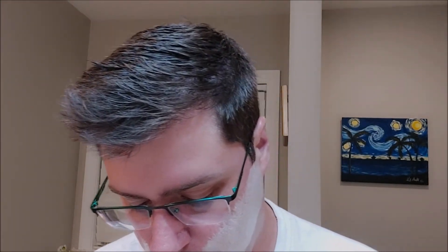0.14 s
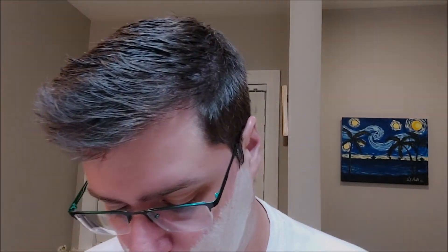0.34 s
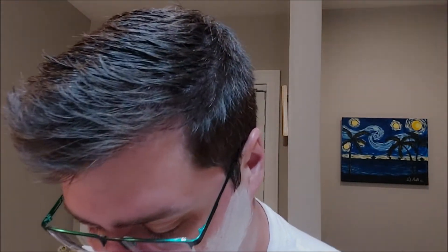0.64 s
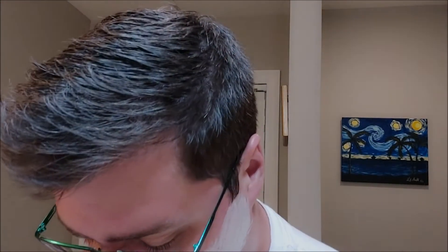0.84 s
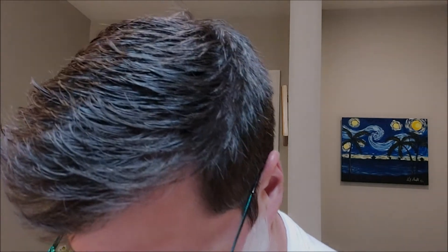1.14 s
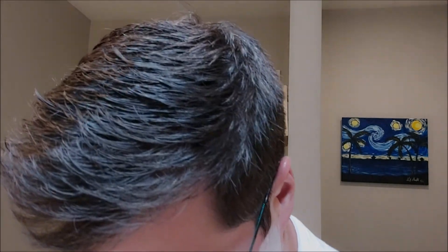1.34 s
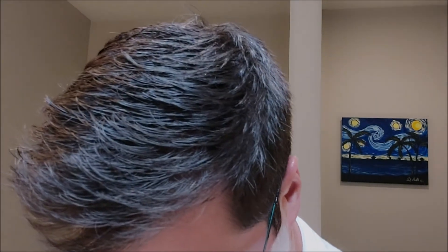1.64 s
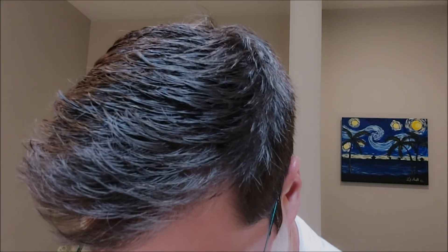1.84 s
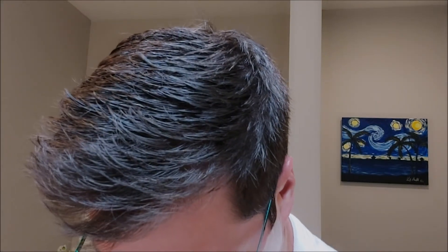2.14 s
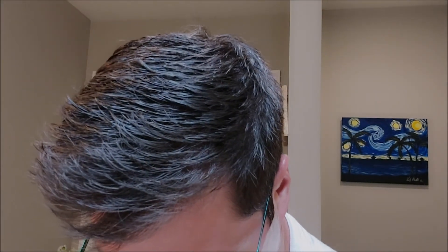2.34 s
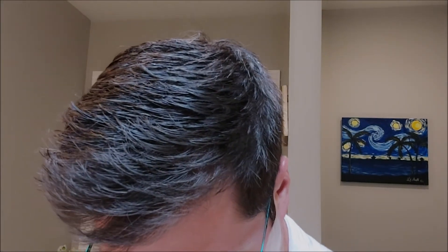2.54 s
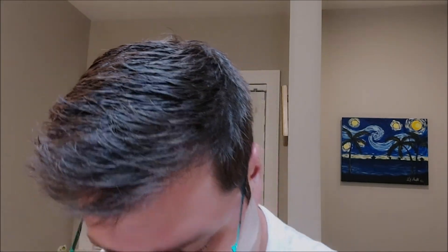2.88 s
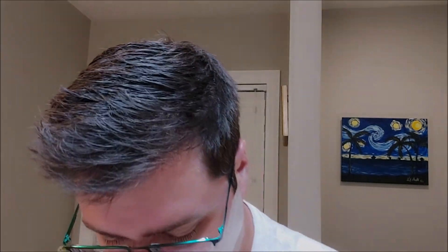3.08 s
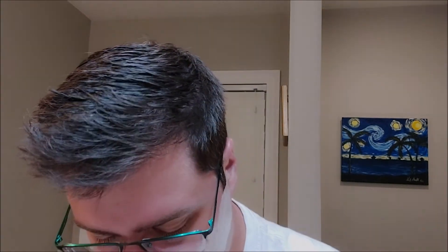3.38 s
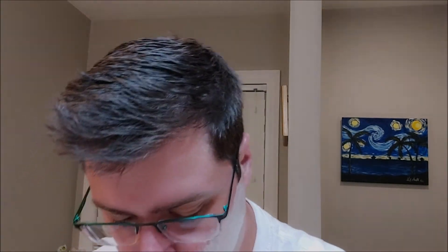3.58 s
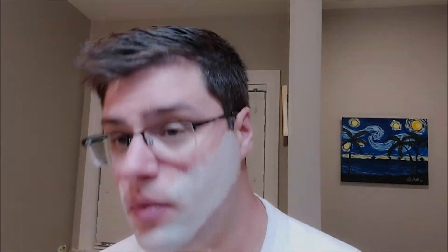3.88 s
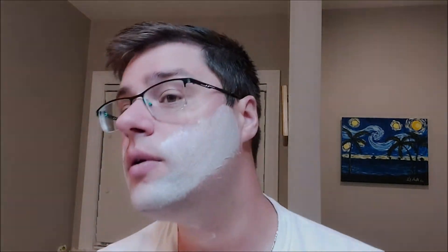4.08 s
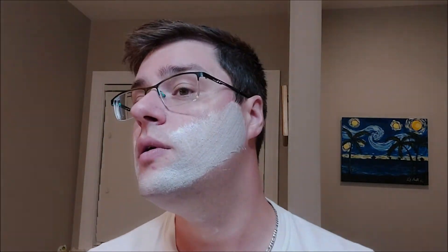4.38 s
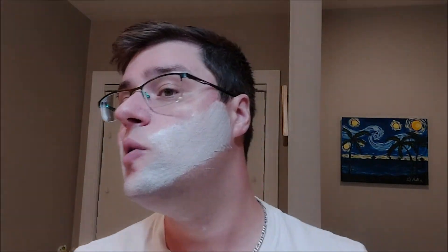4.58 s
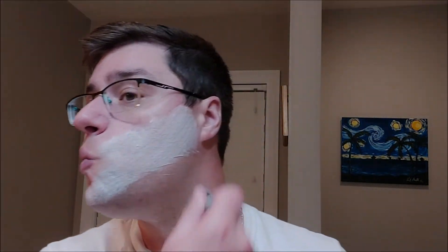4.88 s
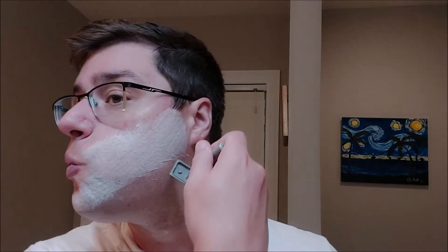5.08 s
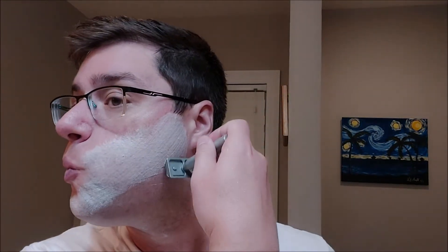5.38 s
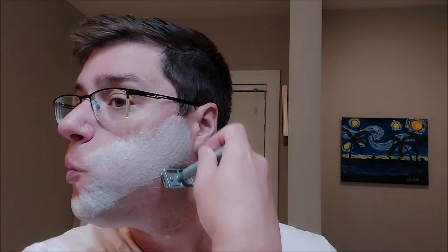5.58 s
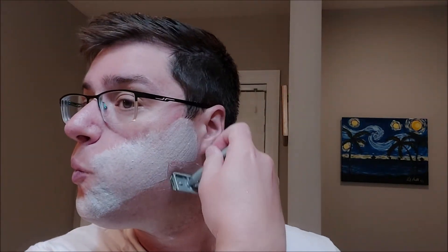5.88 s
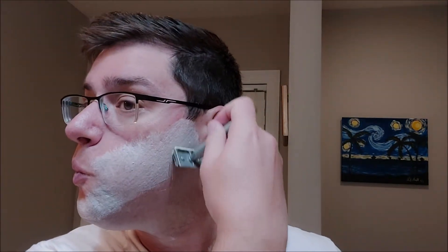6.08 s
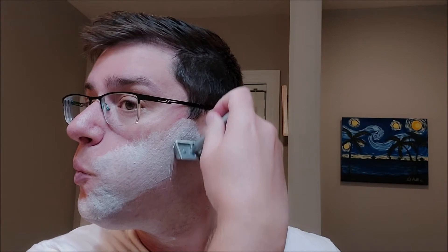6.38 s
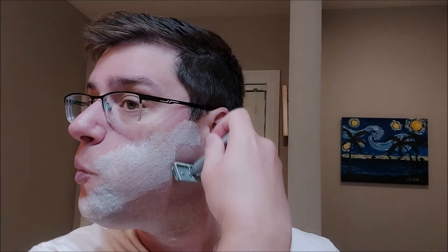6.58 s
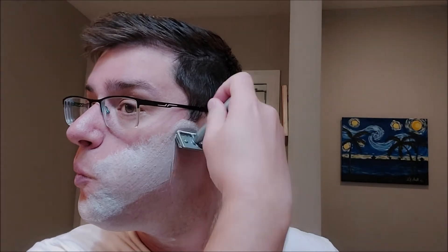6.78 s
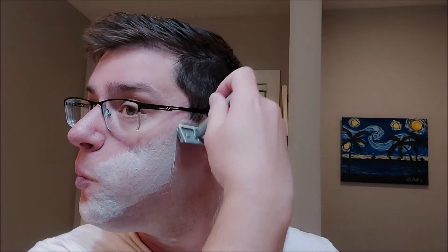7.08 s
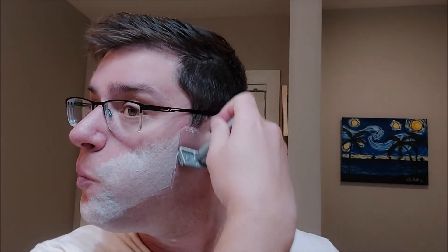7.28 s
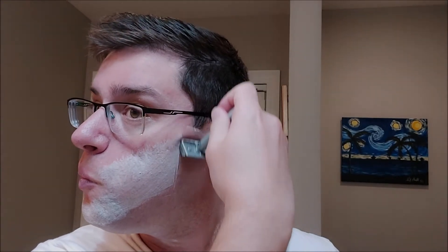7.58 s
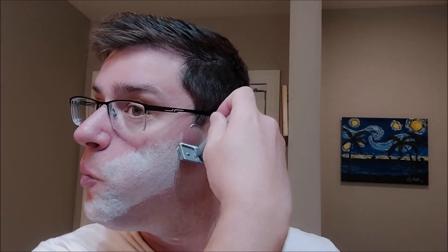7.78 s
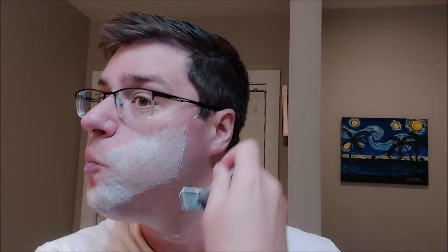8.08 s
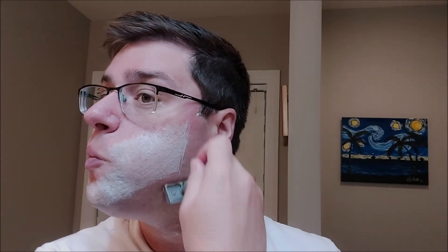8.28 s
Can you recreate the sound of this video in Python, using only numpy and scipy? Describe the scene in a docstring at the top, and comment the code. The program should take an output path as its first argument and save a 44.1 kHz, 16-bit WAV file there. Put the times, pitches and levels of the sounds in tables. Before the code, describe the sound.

From 0 to 3.5 seconds a tap runs strongly into a bathroom basin, a bright, hissing, wide spray with coarser spatter. Sharp little splashes off a rinsed razor cluster in the first half second, then come singly until 3.3. Soft muffled bumps pass through the counter, the heaviest a low thud at 3.0. Around 3.6 the water cuts off with a dull, briefly ringing knock and low thumps. From 3.7 to 4.5 the drain gurgles in gulps, with fine trickling, ticks and rising-pitched drips, drying out by 4.7. Quiet ventilation rumble, low hum and faint hiss remain. Tiny handling touches come near 5.45 and 5.55. From 5.76 short, faint, crisp scrapes of blade through lather and stubble repeat every quarter to third of a second, at about 6.04, 6.36, 6.7, 7.05, 7.39, 7.66 and 7.93, with one last faint stroke starting at 8.4.

```python
"""A tap runs into a bathroom sink: stereo noise and droplet grains coloured by spout and basin resonances,
with droplet bursts splashing off a razor and soft bumps through the counter. The tap shuts with a ringing knock,
then the last water gurgles, trickles and drips away. After two faint handling touches the razor scrapes short
strokes through lather and stubble: dense hair snaps over a duller rasp. Behind it all lie ventilation rumble,
hum, hiss and thin motor tones. Splashes, drips, ticks and knocks leave a short hard room tail."""
import sys
import numpy as np
from scipy import signal
from scipy.fft import rfft, irfft
from scipy.io import wavfile

SR = 44100
rng = np.random.default_rng(int(sys.argv[2]) if len(sys.argv) > 2 else 0)


def to_wav(sig):
    """Store sig (one row per channel, or 1-D mono) as 16-bit WAV at the path in sys.argv[1].

    Samples outside -1..1 are clipped; the rate is SR.
    """
    pcm = np.clip(np.atleast_2d(sig), -1, 1) * 32767
    pcm = np.round(pcm).astype(np.int16)
    wavfile.write(sys.argv[1], SR, pcm.T)  # frames by channels


N = 371763
TIME = np.arange(N) / SR   # seconds
HZ = np.fft.rfftfreq(N, 1 / SR) + 1e-3   # kept off zero for the logarithms
EARS = np.array([[1], [-1]])   # left, right

# Strength of the jet, heard as spray. Each row: time in seconds, level in dB.
JET_LEVEL = [(0.0, -38), (0.14, -37.5), (0.53, -33), (0.6, -35), (2.8, -35.5), (2.85, -31), (3.31, -33),
             (3.49, -35), (3.6, -48.5), (3.8, -84)]
# Spectrum of the running water. Each row: frequency in Hz, relative level in dB per Hz.
WATER_SPECTRUM = [(88, -35), (150, 1.5), (182, 0.5), (649, -6.5), (1040, -2.5), (1240, -7), (1600, -3.5),
                  (2100, -8), (3220, -6), (5360, -6.5), (14200, -1), (16000, -2)]
# Resonances of spout and basin. Each row: frequency in Hz, width in Hz, lift in dB.
SPOUT_RESONANCES = [(230, 40, 4), (470, 30, 4), (1050, 110, 8), (1580, 170, 9), (3250, 400, 5),
                    (6430, 80, 2.5), (7920, 300, 2), (9370, 90, 3), (10600, 130, 3), (12200, 120, 2),
                    (14000, 180, 5)]
# The jet breaks up for a moment. Each row: peak time in seconds, added spray in dB, added spatter in dB.
SURGES = [(0.0, -32, -45), (0.16, -37, -52), (0.39, -51, -50), (0.553, -41, -46.5), (1.015, -52, -42.5),
          (1.345, -42, -49), (1.8, -48.5, -50), (2.66, -59, -51), (2.84, -47, -57), (3.62, -43, -82),
          (3.675, -47, -77)]
SURGE_RISE_DB_PER_S, SURGE_FALL_DB_PER_S = 399, 220.5
FULL_JET_DB = -35.5   # jet level at which the spatter has its own level
SPATTER_DB, SPATTER_FOLLOWS = -46.5, 0.62   # coarser spatter on the porcelain; share of the jet's swing in dB
SPOUT_DB, SHUT_S, SHUT_DB_PER_S = -44, 3.523, 104   # hiss in spout and basin, dying once the tap closes

# Level of the background rumble, hum and hiss. Each row: time in seconds, level in dB.
BACKGROUND_LEVEL = [(0.0, -45.5), (3.87, -46.5), (4.69, -51), (7.47, -50.5), (8.43, -52.5)]
# Spectrum of the rumble. Each row: frequency in Hz, relative level in dB per Hz.
RUMBLE_SPECTRUM = [(20, -24), (32, -18), (42, -23.5), (52, -4), (70, -5.5), (95, -6.5), (130, -5),
                   (170, -21.5), (240, -19), (330, -18), (450, -28), (640, -35.5), (750, -42), (850, -39.5),
                   (950, -47), (1250, -54)]
# Spectrum of the steady hiss. Each row: frequency in Hz, relative level in dB per Hz.
HISS_SPECTRUM = [(900, -16), (1400, -6), (2200, -7.5), (3500, -14.5), (4300, -10), (6000, -9.5),
                 (9000, -8.5), (13000, -6.5), (14800, -8), (15800, -18.5)]
RUMBLE_DB, HISS_DB = -3.5, -27   # relative to the background level
# Hum. Each row: frequency in Hz, level in dB relative to the background level, spread of the waver in dB.
HUM = [(59.7, -6.5, 6.5), (72.8, -6.5, 3), (118.6, -10, 4.5), (252, -30, 3.5)]
# Thin motor tones. Each row: frequency in Hz, approximate rms level in dB.
MOTOR_TONES = [(839.8, -86), (1080, -98.5), (1798, -91), (4200, -101), (9000, -101), (10800, -101),
               (13200, -100)]

# Splashes off razor and basin. Each row: start in seconds, level in dB, centre in Hz, 60 dB decay in seconds.
SPLASHES = [(0.0463, -23.5, 8040, 0.0062), (0.152, -36, 9000, 0.056), (0.2382, -24.5, 4850, 0.0083),
            (0.359, -27.5, 4320, 0.015), (0.3952, -32, 2980, 0.011), (0.4543, -28, 4850, 0.026),
            (0.475, -30, 6730, 0.017), (0.542, -27.5, 7700, 0.033), (1.0123, -29.5, 2900, 0.027),
            (1.349, -37, 10900, 0.045), (1.5402, -31.5, 3340, 0.017), (1.78, -29.5, 6300, 0.012),
            (1.989, -28.5, 4120, 0.028), (2.474, -28, 3280, 0.013), (2.56, -27.5, 3780, 0.011),
            (2.834, -32, 3800, 0.051), (2.988, -32, 6480, 0.026), (3.277, -29, 10800, 0.012)]
# Soft bumps carried through counter and cabinet. Each row: start in seconds, peak in dB, frequency in Hz,
# rise in seconds, 60 dB decay in seconds.
BUMPS = [(0.972, -36.5, 228, 0.038, 0.055), (1.274, -36, 312, 0.013, 0.26), (2.34, -44.5, 225, 0.015, 0.24),
         (2.718, -39.5, 236, 0.013, 0.3), (3.019, -16.5, 125.6, 0.034, 0.14), (3.028, -31, 74, 0.031, 0.13),
         (3.089, -27.5, 123, 0.039, 0.08), (3.616, -25.5, 128.5, 0.028, 0.14),
         (3.681, -27.5, 124, 0.011, 0.091), (4.359, -40, 300, 0.016, 0.37)]
# Knocks on the tap body. Each row: start in seconds, level in dB.
KNOCKS = [(3.609, -30), (3.874, -45.5), (4.365, -54)]
# Modes of the tap body. Each row: frequency in Hz, level in dB relative to the knock, nominal decay in seconds
# (the clean ring takes a little less, the rattle more).
TAP_MODES = [(408, -8, 0.28), (467, -3, 0.27), (592, 0, 0.045), (642, -17, 0.55), (698, -16.5, 0.24),
             (1016, -1.5, 0.042), (1110, -24, 0.06), (1800, -29, 0.04)]

# Drips. Each row: start in seconds, level in dB, starting pitch of the bubble in Hz.
DRIPS = [(3.7704, -43.5, 2970), (3.874, -37.5, 2350), (3.91, -42, 2370), (3.9669, -46, 3480),
         (4.018, -48, 2330), (4.047, -47, 1590), (4.1455, -43, 4260), (4.182, -32.5, 4100),
         (4.249, -38, 2640), (4.2712, -41.5, 1390), (4.3082, -46, 1400), (4.418, -47, 1720),
         (4.4407, -51, 1680), (4.633, -62, 2330)]
# Short ticks of water, then of the razor touching. Each row: start in seconds, level in dB, centre in Hz.
TICKS = [(3.6196, -46, 7500), (3.675, -30, 5430), (3.704, -37, 8210), (3.729, -38, 8840),
         (3.8084, -44, 8300), (3.8713, -45, 6050), (3.968, -46, 8500), (4.0456, -40.5, 10800),
         (4.0701, -54, 10100), (4.17, -39, 11300), (4.183, -47, 14000), (4.233, -42, 8700),
         (4.27, -46.5, 8640), (4.365, -43.5, 8700), (4.459, -49.5, 6060), (4.505, -52, 6650),
         (4.6505, -58.5, 6330), (5.2635, -61.5, 12870), (5.4535, -58, 5000), (5.4923, -61, 2400),
         (5.556, -55.5, 7620), (5.59, -56, 8900), (6.3124, -62, 10970), (6.3405, -70, 8340)]
TICK_T60_S = .009
# The last water leaves the basin in gulps. Each row: peak time in seconds, gurgle in dB, trickle in dB,
# trickle fading in dB per second.
GULPS = [(3.63, -50, -42, 104), (3.874, -46.5, -57.5, 32), (4.176, -47.5, -58, 49), (4.367, -52, -65.5, 23)]
# Spectrum of the gurgle. Each row: frequency in Hz, relative level in dB per Hz.
GURGLE_SPECTRUM = [(120, -26), (200, 0.5), (302, -2), (390, -19), (444, -2.5), (652, -30), (879, -5.5),
                   (1070, -29), (1470, -15), (4200, -18), (6000, -62), (7800, -56), (13200, -120)]
GULP_RISE_DB_PER_S, GURGLE_FALL_DB_PER_S = 500, 30.5
DRY_S, DRY_DB_PER_S = 4.49, 51   # the basin starts to run dry at this rate, then ever faster

# Razor sounds: two faint handling touches, then strokes on the cheek. Each row: touch in seconds,
# bite in dB relative to full strength, build-up in seconds, hold in seconds, scrape level in dB.
RAZOR_MOVES = [(5.447, -2, .005, .01, -73), (5.55, -4, 0.018, .03, -84), (5.763, -9, .01, .05, -56),
               (6.039, -13, 0.074, .02, -58), (6.36, -14, 0.067, 0.064, -57),
               (6.704, -10, 0.086, 0.072, -56), (7.046, -17, .11, 0.041, -56.5),
               (7.388, -6, 0.072, .03, -60), (7.664, -10, 0.044, 0.027, -60.5),
               (7.929, -13, 0.033, 0.0092, -58.5), (8.396, -9, .04, .03, -65)]
# Spectrum of the scrape, thinned further below 3500 Hz. Each row: frequency in Hz, relative level in dB per Hz.
BLADE_SPECTRUM = [(1470, -39), (2500, -29), (3720, -15), (4580, -6), (7080, -4), (8530, -2), (12500, 1),
                  (15200, 2), (16000, -9.5)]
# Duller rasp of the razor sounds. Each row: peak time in seconds, level in dB, centre in Hz.
RASPS = [(5.454, -84, 3400), (5.49, -80, 1800), (5.59, -87, 2500), (5.86, -84, 3400), (6.09, -87, 2480),
         (6.43, -79.5, 2480), (6.745, -71.5, 2600), (6.85, -88, 3600), (7.13, -84, 2400),
         (7.225, -77, 1500), (7.42, -92, 2470), (7.7, -90, 2500)]
TOUCH_S = 0.0056   # quick onset
SAG_DB_PER_S, LIFT_DB_PER_S = 45, 200   # the move slackens while held, then dies away
RASP_RISE_DB_PER_S, RASP_FALL_DB_PER_S = 900, 110
RASP_WIDTH = .2   # spread of the rasp bands in log pitch

# Likeness of the two ears in noise. Each row: frequency in Hz, likeness from 0 to 1.
LIKENESS = [(60, 1), (200, 0.89), (380, 0.83), (700, 0.063), (1290, 0.23), (2400, 0.11), (8000, 0.0)]
# Stereo colour of the sink. Each row: frequency in Hz, left minus right in dB.
SINK_BALANCE = [(60, 7), (250, 1.5), (600, -0.9), (1400, -0.8), (2800, 2.5), (5600, -2), (10000, 1.3),
                (14000, 1)]
ROOM_LEFT_DB = 1.06   # left minus right of bumps, razor and ventilation
ROOM_T60_S, ROOM_DB = .25, 1   # room tail: decay, level relative to the direct sound
CUTOFF_HZ = 16000


def from_db(db):
    """Gain of a level."""
    return 10 ** (np.asarray(db) / 20)


def rms_one(x):
    """Scale to unit rms."""
    return x / np.sqrt(np.mean(x ** 2) + 1e-20)


def in_time(rows):
    """Level curve at every sample, in dB; silent outside its span."""
    s, db = np.transpose(rows)
    return np.interp(TIME, s, db, left=-120, right=-120)


def at_hz(points, hz):
    """A spectrum read on a log-frequency axis."""
    point_hz, value = np.transpose(points)
    return np.interp(np.log(hz), np.log(point_hz), value)


def colour(x, gain):
    """Filter by a gain per frequency; rms 1."""
    return rms_one(irfft(rfft(x) * gain, N))


def drift(rate_hz):
    """Slow random wandering of spread 1."""
    return colour(rng.standard_normal(N), 1 / (1 + (HZ / rate_hz) ** 2) * (HZ > .3))


def swell(s, db, rise_db_per_s, fall_db_per_s):
    """Gain that climbs to a peak at a time and falls away, both steadily in dB; a rate of 0 holds level."""
    return from_db(db - np.maximum(rise_db_per_s * (s - TIME), fall_db_per_s * (TIME - s)))


def stereo_noise():
    """White noise, alike in both ears in the bass and unrelated in the treble."""
    mid, side = rfft(rng.standard_normal((2, N)))
    alike = np.clip(at_hz(LIKENESS, HZ), 0, 1)
    return irfft(np.sqrt(1 + alike) * mid + np.sqrt(1 - alike) * side * EARS, N)


def grains(per_s, spread_db):
    """Random stereo clicks of uneven size and either sign."""
    born = rng.random((2, N)) < per_s / SR
    size_db = spread_db * np.minimum(rng.exponential(1, (2, N)), 5)
    return born * from_db(size_db) * rng.choice([-1, 1], (2, N))


def droplets(per_s, spread_db, low_hz, high_hz, cycles):
    """Grains dealt to twelve small resonators spread in pitch, each dying 60 dB in so many cycles; rms 1."""
    clicks = grains(per_s, spread_db)
    dealt = rng.integers(0, 12, N)
    out = 0
    for k, hz in enumerate(np.geomspace(low_hz, high_hz, 12)):
        r = from_db(-60 * hz / (cycles * SR))   # pole radius
        w = 2 * np.pi * hz / SR
        ring_in, ring_back = [0, np.sin(w) * np.sqrt(hz)], [1, -2 * r * np.cos(w), r * r]
        out = out + signal.lfilter(ring_in, ring_back, clicks * (dealt == k) + 1e-18)
    return rms_one(out)


def band_noise(noise, hz, q):
    """Noise through one resonance; rms 1."""
    return rms_one(signal.lfilter(*signal.iirpeak(hz, q, fs=SR), noise))


def add(out, s, sound):
    """Mix a short sound in at a time."""
    at = int(s * SR)
    out[at:at + len(sound)] += sound[:N - at]


def jet():
    """Spray noise and droplet grains, lifted at the spout resonances; bands flicker partly on their own."""
    jet_db = in_time(JET_LEVEL)
    spray_gain = from_db(jet_db)
    spatter_gain = from_db(SPATTER_DB + SPATTER_FOLLOWS * (jet_db - FULL_JET_DB))
    for s, spray_db, spatter_db in SURGES:
        spray_gain = spray_gain + swell(s, spray_db, SURGE_RISE_DB_PER_S, SURGE_FALL_DB_PER_S)
        spatter_gain = spatter_gain + swell(s, spatter_db, SURGE_RISE_DB_PER_S, SURGE_FALL_DB_PER_S)
    spout_gain = swell(SHUT_S, SPOUT_DB, 0, SHUT_DB_PER_S)

    lift_db = sum(db / (1 + (2 * (HZ - hz) / width) ** 2) for hz, width, db in SPOUT_RESONANCES)
    gain = from_db(at_hz(WATER_SPECTRUM, HZ) + lift_db)
    water = stereo_noise() + 0.46 * rms_one(grains(3000, 3.5))
    water += .5 * droplets(1500, 3.37, 2000, 13000, cycles=24.0)

    # power shares below each edge: spout hiss lowest, spatter between, spray on top
    low, middle = 1 / (1 + (HZ / 2200) ** 8), 1 / (1 + (HZ / 4500) ** 8)
    out = spout_gain * from_db(drift(7.6)) * colour(water, gain * np.sqrt(low))
    spatter = colour(water, gain * np.sqrt((1 - low) * middle))
    out += spatter_gain * from_db(1.3 * drift(27) + 1.5 * drift(1.0)) * spatter

    together, spray = drift(55), 0
    spray_spectrum = rfft(water) * gain * np.sqrt(1 - middle)
    half_octave = np.clip(2 * np.log2(HZ / 5000), 0, 3)
    for k in range(4):   # overlapping half-octave windows that sum to one
        window = np.clip(1 - np.abs(half_octave - k), 0, 1)
        flicker_db = 0.83 * together + 1.7 * drift(12)
        spray = spray + from_db(flicker_db) * irfft(spray_spectrum * window, N)
    return out + spray_gain * rms_one(spray)


def wavering(hz, waver_db):
    """A steady tone whose strength wanders; rms about 1."""
    tone = np.sin(2 * np.pi * (hz * TIME + rng.random()))
    return np.sqrt(2) * from_db(waver_db * drift(4.0)) * tone


def ventilation():
    """Rumble with wavering hum, thin motor tones and a steady hiss."""
    rumble = from_db(RUMBLE_DB) * colour(stereo_noise(), from_db(at_hz(RUMBLE_SPECTRUM, HZ)) * (HZ < 1300))
    hum = sum(from_db(db) * wavering(hz, waver_db) for hz, db, waver_db in HUM)
    hiss = from_db(HISS_DB) * colour(stereo_noise(), from_db(at_hz(HISS_SPECTRUM, HZ)) * (HZ > 900))
    tones = sum(from_db(db) * wavering(hz, 1.1) for hz, db in MOTOR_TONES)
    return from_db(in_time(BACKGROUND_LEVEL)) * (rumble + hum + hiss) + tones


def splashes():
    """Bursts of droplets: dying noise in a broad band around a centre, brightened by its own differences."""
    out, t = np.zeros(N), np.arange(SR // 8) / SR
    for s, db, hz, t60 in SPLASHES:
        noise = rng.standard_normal(len(t))
        burst = band_noise(noise, hz, 2.5) + 0.53 * np.diff(noise, prepend=0)
        add(out, s, from_db(db - 60 * t / t60) * burst)
    return out


def bumps():
    """Low panel modes that swell and die."""
    out, t = np.zeros(N), np.arange(SR // 2) / SR
    for s, db, hz, rise, t60 in BUMPS:
        onset = np.sin(np.pi / 2 * np.minimum(t / rise, 1)) ** 2
        decay = from_db(-60 * np.maximum(t - rise, 0) / t60)
        add(out, s, from_db(db) * onset * decay * np.sin(2 * np.pi * hz * t))
    return out


def tap():
    """Each knock rings the modes of the tap body, and loose parts keep rattling them briefly."""
    out, t = np.zeros(N), np.arange(SR // 2) / SR
    for s, db in KNOCKS:
        for hz, level_db, t60 in TAP_MODES:
            clean = np.sin(2 * np.pi * hz * t) * from_db(-60 * t / (0.8 * t60))
            rattle = band_noise(rng.standard_normal(len(t)), hz, 5.5) * from_db(-60 * t / (1.77 * t60))
            add(out, s, from_db(db + level_db) * (clean + .5 * rattle))
    return out


def drips_and_ticks():
    """A drip is a bubble ringing a few cycles, rising in pitch; a tick is a snap of noise around its centre."""
    out, t = np.zeros(N), np.arange(SR // 20) / SR
    for s, db, hz in DRIPS:
        t60 = 0.0063 + 44.0 / hz
        plop = band_noise(rng.standard_normal(len(t)), hz, 1.5)
        bubble = np.sin(2 * np.pi * hz * t * (1 + 0.07 * np.minimum(t / t60, 1)))
        add(out, s, from_db(db - 60 * t / t60) * (bubble + 0.4 * plop))
    for s, db, hz in TICKS:
        noise = rng.standard_normal(len(t))
        snap = band_noise(noise, hz, 2.2) + 0.071 * np.diff(noise, 2, prepend=[0, 0])
        add(out, s, from_db(db - 60 * t / TICK_T60_S) * snap)
    return out


def drain():
    """Lumpy gurgle in the waste pipe and a fine trickle of droplets, renewed by every gulp."""
    wet = swell(DRY_S, 0, 0, DRY_DB_PER_S) ** (1 + np.maximum(TIME - DRY_S, 0))
    gurgles = [swell(s, db, GULP_RISE_DB_PER_S, GURGLE_FALL_DB_PER_S) for s, db, _, _ in GULPS]
    trickles = [swell(s, db, GULP_RISE_DB_PER_S, fall) for s, _, db, fall in GULPS]
    gurgle_gain, trickle_gain = np.max(gurgles, axis=0), np.max(trickles, axis=0)

    lumps = stereo_noise() + 0.72 * droplets(300, 2.8, 791, 4430, cycles=81.0)
    lumps += .5 * droplets(400, 4.5, 1140, 6000, cycles=8.0)
    gurgle = colour(lumps, from_db(at_hz(GURGLE_SPECTRUM, HZ)) * (HZ < 7000))

    hiss = colour(stereo_noise(), 1 / np.sqrt(1 + (4500 / HZ) ** 6) / np.sqrt(1 + (HZ / 9000) ** 2))
    trickle = hiss + droplets(250, 3.0, 4700, 13000, cycles=30.0)
    trickle += 0.43 * droplets(77, 6.7, 2800, 17000, cycles=3.0)

    gurgle = gurgle_gain * from_db(1.1 * drift(22)) * gurgle
    trickle = trickle_gain * from_db(1.4 * drift(27)) * trickle
    return wet * (gurgle + trickle)


def razor_move(touch, bite_db, build, hold, db):
    """Gain of one touch or stroke: bite, build-up, slackening, dying away."""
    full = touch + TOUCH_S + build   # moment of full strength
    rising = bite_db * np.clip((full - TIME) / build, 0, 1) ** 2
    falling = SAG_DB_PER_S * np.clip(TIME - full, 0, hold) + LIFT_DB_PER_S * np.maximum(TIME - full - hold, 0)
    return np.clip((TIME - touch) / TOUCH_S, 0, 1) * from_db(db + rising - falling)


def razor():
    """Faint touches, then strokes: hairs snap densely under the edge, skin and lather add a shifting rasp."""
    snaps = 0.85 * rms_one(grains(2400, 3.7)) + stereo_noise()
    scrape = colour(snaps, from_db(at_hz(BLADE_SPECTRUM, HZ)) / np.sqrt(1 + (3500 / HZ) ** 8))
    rasp = 0
    for hz in (1600, 2400, 3400):   # each rasp feeds the bands nearest its centre
        band_gain = 0
        for s, db, centre in RASPS:
            nearness = np.exp(-(np.log(centre / hz) / 0.36) ** 2)
            band_gain = band_gain + nearness * swell(s, db, RASP_RISE_DB_PER_S, RASP_FALL_DB_PER_S)
        rasp = rasp + band_gain * colour(snaps, np.exp(-(np.log(HZ / hz) / RASP_WIDTH) ** 2))
    scrape_gain = sum(razor_move(*row) for row in RAZOR_MOVES)
    return scrape_gain * from_db(0.82 * drift(45)) * scrape + from_db(1.3 * drift(30)) * rasp


def bathroom(x):
    """Direct sound plus a dense dying tail of its own in each ear."""
    t = np.arange(int(.6 * SR)) / SR
    tail = rng.standard_normal((2, len(t))) * from_db(-60 * t / ROOM_T60_S) * (t > .003)
    tail *= from_db(ROOM_DB) / np.sqrt(np.sum(tail ** 2, axis=1, keepdims=True))
    return x + signal.fftconvolve(x[None], tail, axes=1)[:, :N]


def scene():
    """Everything that sounds in the room; the sink and all ticks reach the two ears with different colour."""
    sink = jet() + drain() + bathroom(splashes() + drips_and_ticks() + tap())
    balance = from_db(at_hz(SINK_BALANCE, HZ) / 2 * EARS)
    bass_cut = 1 / np.sqrt(1 + (150 / HZ) ** 4)   # the sink radiates little bass
    sink = irfft(rfft(sink) * balance * bass_cut, N)
    return sink + from_db(ROOM_LEFT_DB / 2 * EARS) * (bumps() + razor() + ventilation())


def record(dry):
    """A steep low-pass cuts the top, 60 dB down from the cutoff upwards."""
    return signal.sosfilt(signal.cheby2(20, 60, CUTOFF_HZ, fs=SR, output="sos"), dry)


dry = scene()
out = record(dry)
to_wav(out)
```